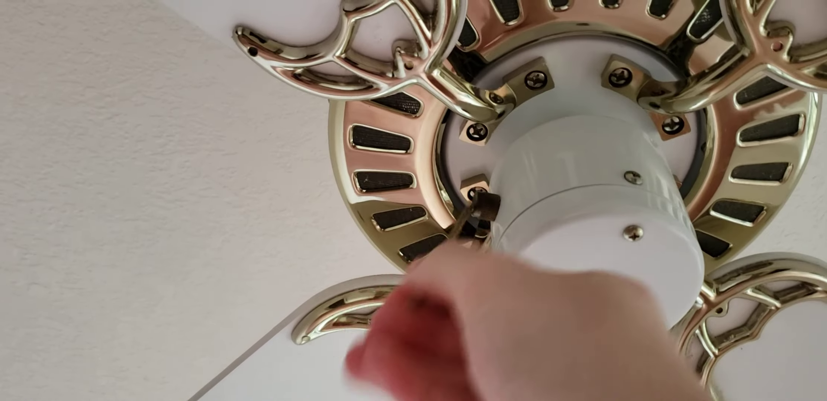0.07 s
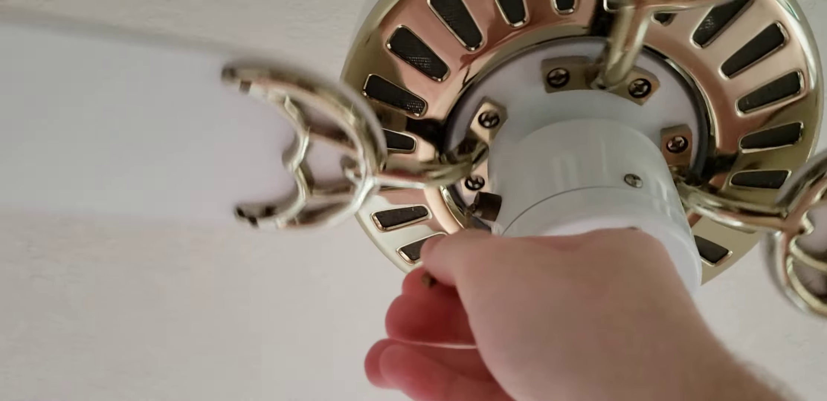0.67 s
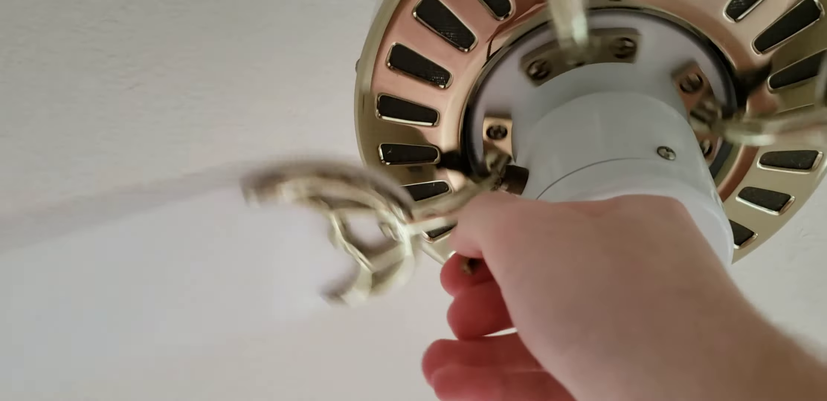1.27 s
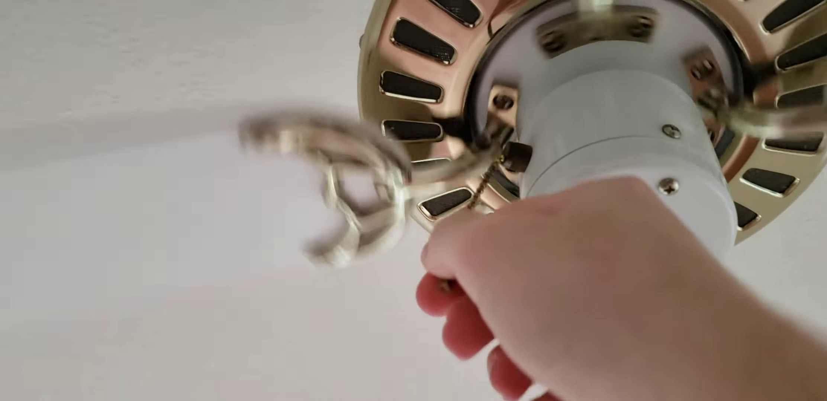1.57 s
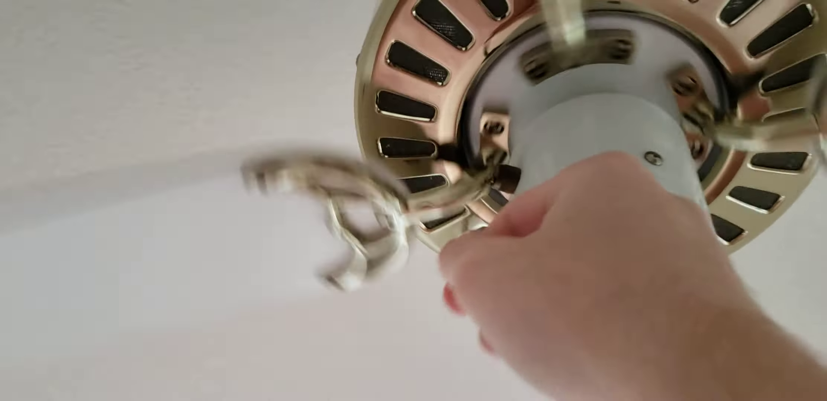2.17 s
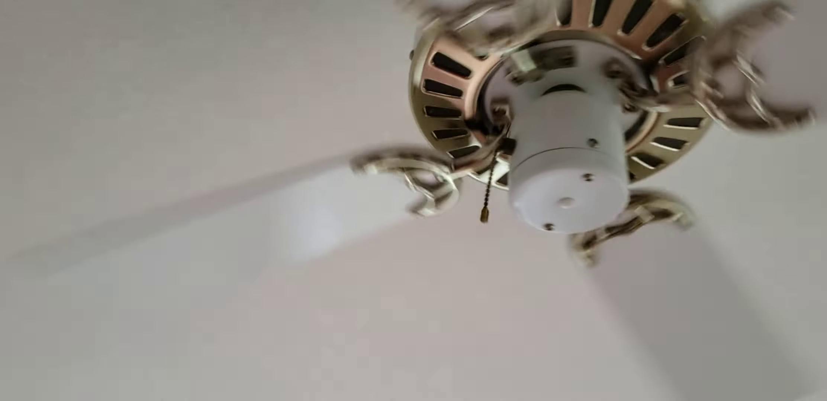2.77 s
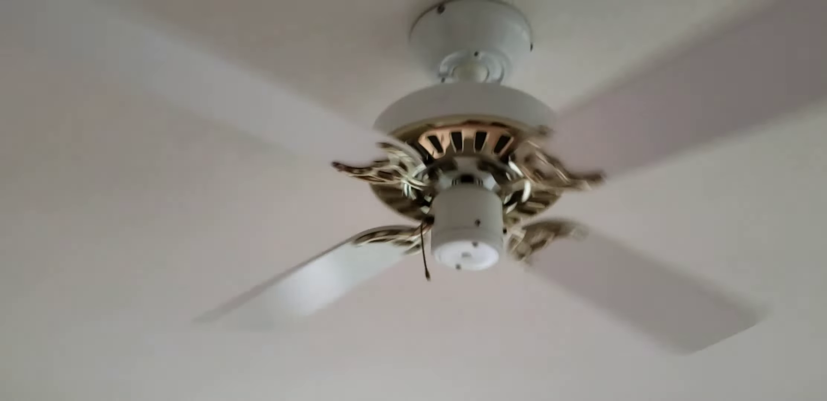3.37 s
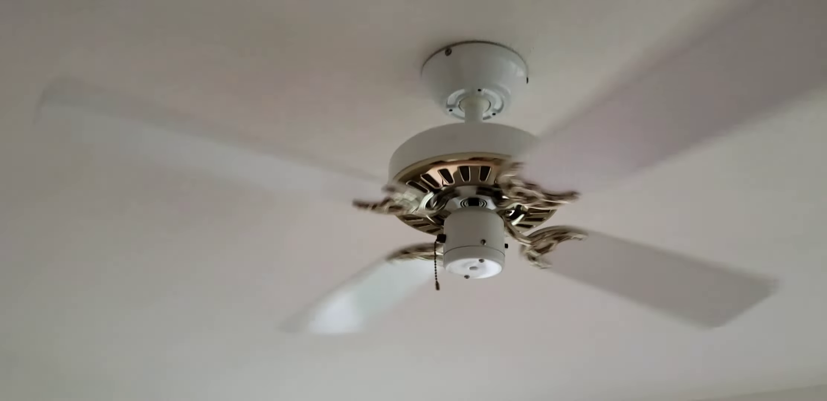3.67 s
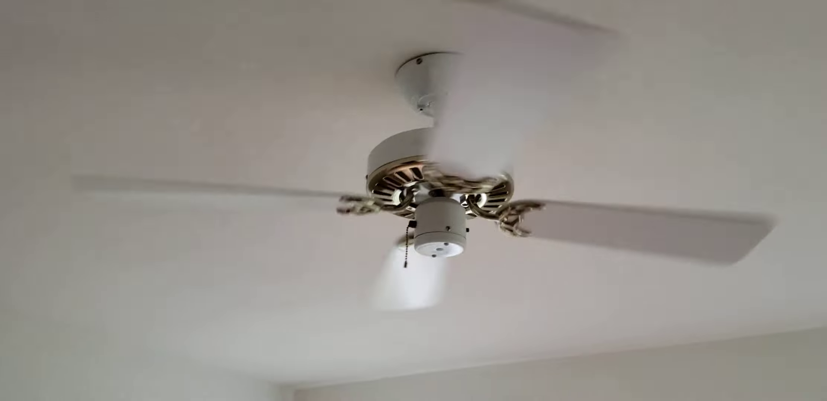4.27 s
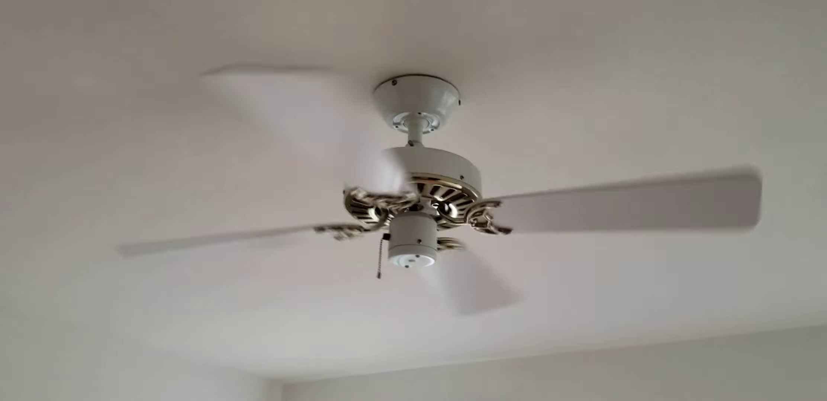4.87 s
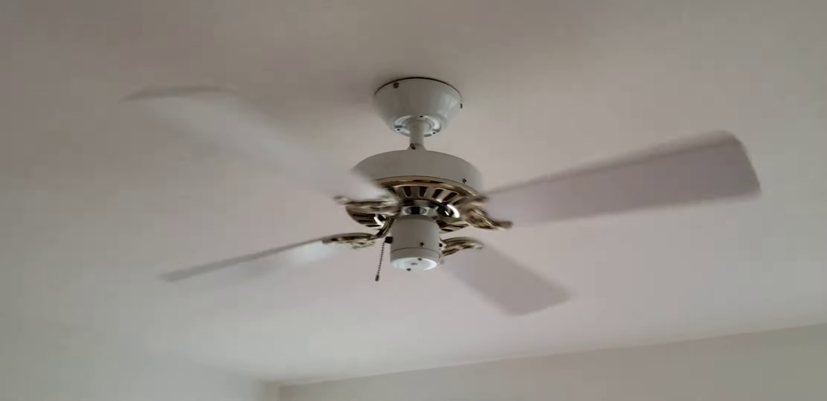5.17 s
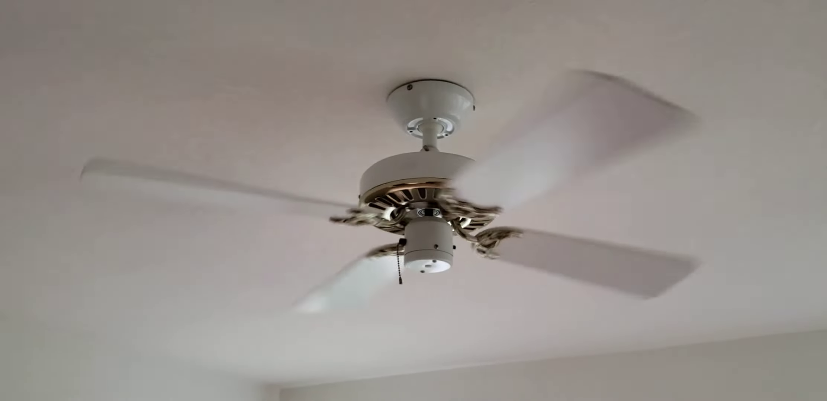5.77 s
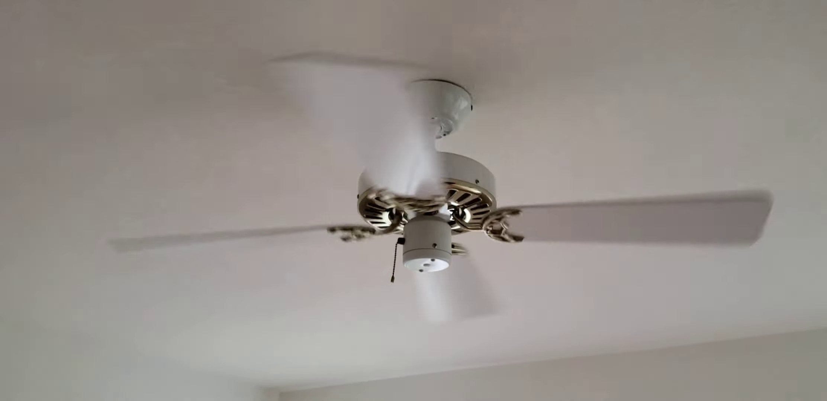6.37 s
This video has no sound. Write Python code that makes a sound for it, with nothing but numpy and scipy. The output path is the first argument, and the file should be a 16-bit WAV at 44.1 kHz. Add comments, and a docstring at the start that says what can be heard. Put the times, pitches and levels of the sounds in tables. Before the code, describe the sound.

A beaded chain ticks and a ceiling fan switch snaps sharply, again and again for a couple of seconds, close by in a small room. Each pull rings the metal housing briefly, and several bring a dull low thump. Afterwards it is much quieter: cloth rustles and small handling ticks sound near the microphone while the spinning fan stirs a soft, low rumble of air.

```python
"""Ceiling fan pull chain

A pull chain is tugged and let go again and again, close to a hand-held camera in a small room. Beads tick over
the eyelet and the switch snaps, each impact exciting the modes of its metal housing, while the tugs set the low
modes of the room booming. Then a sleeve swishes by friction as the camera backs away, over the soft rumble and
rush of the air stirred by the blades."""
import sys
import numpy as np
from scipy import signal
from scipy.fft import rfft, irfft, next_fast_len
from scipy.io import wavfile
from scipy.ndimage import uniform_filter1d, map_coordinates

SR = 44100
rng = np.random.default_rng(int(sys.argv[2]) if len(sys.argv) > 2 else 0)


def wav_record(signal):
    """Record a signal, one row per channel, as 16-bit PCM in the file named by sys.argv[1]."""
    frames = np.transpose(np.atleast_2d(signal))
    bounded = np.clip(frames, -1, 1)
    # unit amplitude maps onto the largest positive 16-bit level
    quanta = np.round(bounded * 32767).astype(np.int16)
    wavfile.write(sys.argv[1], SR, quanta)


N = 287532


def amp(db):
    """Amplitude ratio of a level in decibels."""
    return 10 ** (np.asarray(db) / 20)


def unit(x):
    """Normalisation to rms 1."""
    return x / np.sqrt(np.mean(x ** 2) + 1e-20)


def along(points, hz):
    """Interpolation of (f/Hz, value) points on a logarithmic frequency axis."""
    f, values = np.transpose(points)
    return np.interp(np.log(hz + 1), np.log(f), values)


def wobble(rate):
    """Smooth random modulation: a spline through `rate` Gaussian values a second."""
    knots = rng.standard_normal(int(N * rate / SR) + 4)
    return map_coordinates(knots, [np.arange(N) * rate / SR])


def add(track, onset, sound):
    """Superposition of a sound on the track, from an onset in seconds."""
    part = track[..., max(round(onset * SR), 0):][..., :sound.shape[-1]]
    part += sound[..., :part.shape[-1]]


def filtered(x, response):
    """Linear filtering: the spectrum is multiplied by a frequency response."""
    n = x.shape[-1]
    padded = next_fast_len(n + 2048)
    return irfft(rfft(x, padded) * response(np.fft.rfftfreq(padded, 1 / SR)), padded)[..., :n]


# Likeness of the sound at the two microphone ports: f/Hz, coherence
COHERENCE = [(60, 0.94), (290, 0.84), (640, 0.48), (1400, 0), (15000, 0.17)]
def noise(spectrum, size=N):
    """Partially coherent stereo noise of rms 1: long waves reach both ports alike."""
    padded = next_fast_len(size)
    hz = np.fft.rfftfreq(padded, 1 / SR)
    angle = np.arccos(np.clip(along(COHERENCE, hz), -1, 1)) / 2
    white = rng.standard_normal((2, len(hz))) + 1j * rng.standard_normal((2, len(hz)))
    coloured = white * amp(along(spectrum, hz))
    mid, side = irfft(coloured * [np.cos(angle), np.sin(angle)], padded)[:, :size]
    return unit(np.array([mid + side, mid - side]))


def burst(spectrum, rise, t60, size=4096):
    """Impact transient: noise that rises to rms 1 and decays exponentially (rise/s, t60/s)."""
    t = np.arange(size) / SR
    envelope = (1 - np.exp(-t / rise)) ** 2 * amp(-60 * t / t60)
    envelope /= envelope.max()
    return unit(noise(spectrum, size) * envelope) * np.sqrt(np.mean(envelope ** 2))


# Spectra of the blades' rumble, their rush of air and the room's hiss: f/Hz, relative level/dB
RUMBLE_SPECTRUM = [(12, -63), (20, -36.5), (27, -24), (29, -24), (36, -22.5), (46, -6), (59, 6.5),
                   (83, 3.5), (100, -3), (119, -5.5), (173, -12), (200, -28), (260, -50.5), (440, -120)]
RUSH_SPECTRUM = [(90, -12.5), (170, -0.5), (280, -1), (400, -3), (520, -10), (750, -22), (1400, -38)]
ROOM_HISS_SPECTRUM = [(350, -37.5), (600, -2), (748, -5), (812, -3.5), (1160, -9), (1590, 0), (2340, -5.5),
                      (2910, -12), (4050, -9.5), (5870, -15.5), (7310, -3.5), (9110, -12.5), (12700, -14),
                      (16000, -14.5)]
# Strength of the rush in the fan's draught: t/s, relative level/dB
RUSH_LEVELS = [(2.5, -69.5), (3.02, -74), (3.28, -67.5), (3.68, -63.5), (4.56, -70), (4.77, -69.5),
               (6.5, -68.5)]
def fan(rumble_db, downwash_db, rush_db, hiss_db):
    """Turbulence: the blades stir a rumble, stronger in their downwash, and a rush over faint room hiss."""
    t = np.arange(N) / SR
    entry_s, rise_s = 3.14, 0.25  # the camera backs into the draught
    in_downwash = (1 + np.tanh((t - entry_s) / (2 * rise_s))) / 2
    rumble = amp(rumble_db + downwash_db * in_downwash + 1.1 * wobble(4)) * noise(RUMBLE_SPECTRUM)
    draught_db = np.interp(t, *np.transpose(RUSH_LEVELS))
    rush = amp(draught_db + rush_db + 1.5 * wobble(7)) * noise(RUSH_SPECTRUM)
    return rumble + rush + amp(hiss_db) * noise(ROOM_HISS_SPECTRUM)


# Rubs of taut chain and cloth: crest t/s, half-length/s, f/Hz, bandwidth/Hz, relative level/dB
RASPS = [(0.609, 0.094, 1500, 201, -74), (1.32, 0.24, 1510, 59.9, -86), (1.396, 0.051, 1784, 503, -65.5),
         (1.40, 0.046, 3900, 500, -71.5), (3.31, 0.036, 4725, 1300, -54.5), (3.44, 0.2, 2270, 520, -62),
         (3.469, 0.09, 3350, 1200, -59), (3.656, 0.23, 2250, 420, -64), (3.645, 0.061, 4900, 1100, -65.5),
         (3.996, .14, 3540, 1100, -66), (4.909, 0.068, 3130, 920, -53.5), (5.608, 0.039, 900, 400, -62.5),
         (5.864, 0.037, 3980, 1400, -55.5), (6.24, 0.065, 5200, 1400, -63)]
def scrapes(level_db):
    """Sliding friction: a surface catches briefly and rasps in one narrow band."""
    out = np.zeros((2, N))
    for crest, half_length, hz, width, db in RASPS:
        size = int(2 * half_length * SR)
        rasp = filtered(rng.standard_normal((2, size)), lambda f: 1 / (1 + ((f - hz) / (width / 2)) ** 2))
        add(out, crest - half_length, amp(db + level_db) * unit(rasp) * np.hanning(size))
    return out


# Fingers on the camera: t/s, relative tick level/dB, relative bump level/dB
FINGER_TAPS = [(3.8455, -46, -55.5), (3.883, -50, -76), (3.9178, -44, -71), (4.478, -56.5, -74),
               (4.7403, -54, -43), (5.2579, -47.5, -76), (5.2835, -39, -49)]
def finger_taps(tick_db, bump_db):
    """Heavily damped impacts: fingers shifting on the case make dry ticks and dull bumps."""
    tick_spectrum = [(500, -11), (1500, 9.5), (4000, 9.5), (13000, 4.5), (17000, -5)]
    bump_spectrum = [(60, 1), (400, 2), (750, -5), (1400, -36), (4000, -47)]
    out = np.zeros((2, N))
    for onset, high_db, low_db in FINGER_TAPS:
        tick = burst(tick_spectrum, rise=0.00005, t60=0.0049)
        bump = burst(bump_spectrum, rise=0.00043, t60=0.022)
        add(out, onset, amp(high_db + tick_db) * tick + amp(low_db + bump_db) * bump)
    return out


def shifting_folds(x, depth_db):
    """Time-varying filtering: folds of cloth colour the sound in random patches of time and frequency."""
    spectra = signal.stft(x, nperseg=512)[2]
    patches = uniform_filter1d(rng.standard_normal(spectra.shape[1:]), size=7, axis=0)
    patches = uniform_filter1d(patches, size=16, axis=1)
    return unit(signal.istft(spectra * amp(depth_db * unit(patches)), nperseg=512)[1][:, :N])


# Arm strokes: crest t/s, rise/s, fall/s, relative level/dB, rub offset/dB, hiss offset/dB
SLEEVE_STROKES = [(2.6, 0.037, 0.081, -73.5, -13, -3.5), (2.81, .05, 0.048, -71, -19, -3.5),
                  (2.89, .03, 0.044, -73, -19, -4), (3.168, 0.032, 0.07, -62.5, -10, -4.5),
                  (3.3, 0.017, 0.06, -53.5, -21, -11.5), (3.36, 0.048, 0.023, -59, -9, 0.5),
                  (3.455, 0.061, 0.078, -55.5, -24, -1), (3.64, 0.096, .06, -64, -13, -16),
                  (3.744, 0.05, 0.054, -53.5, -11.5, -6), (3.85, .04, .06, -65, -2, -8),
                  (3.925, 0.021, 0.23, -65, -12, -4), (4.27, 0.057, 0.052, -60, -22, 2),
                  (4.303, .025, 0.058, -57, -10, -14), (4.42, .04, 0.051, -69.5, -11, -2),
                  (4.616, 0.065, 0.083, -56, -5, -1.5), (4.759, .015, 0.058, -52, -7, -10.5),
                  (4.815, 0.047, 0.089, -52.5, -6.5, -5.5), (4.916, .055, 0.055, -53.5, -7.5, -2.5),
                  (5.06, 0.084, 0.095, -53.5, -15.5, -2), (5.17, 0.059, 0.063, -62.5, -5.5, -1),
                  (5.295, .01, 0.083, -72, 3.5, -1.5), (5.612, 0.028, 0.031, -55, -2, 2.5),
                  (5.853, .015, 0.054, -56, -2, -25), (5.975, 0.026, 0.028, -65, -3, -3),
                  (6.044, 0.06, 0.079, -61.5, -5.5, -3), (6.295, 0.084, 0.058, -54.5, -12, -5.5)]
def stroke_envelopes():
    """Incoherent addition: overlapping strokes sum in power, giving the gains of swish, rub and hiss."""
    edge_db, roundness = 11.5, 1.28  # drop one rise or fall time from the crest; exponent of the slope
    t, power = np.arange(N) / SR, np.zeros((3, N))
    for crest, rise, fall, db, rub_db, hiss_db in SLEEVE_STROKES:
        near = slice(max(int((crest - 5 * rise) * SR), 0), int((crest + 5 * fall) * SR))
        from_crest = np.maximum((crest - t[near]) / rise, (t[near] - crest) / fall)
        envelope = amp(db - edge_db * from_crest ** roundness)
        power[:, near] += (amp([[0], [rub_db], [hiss_db]]) * envelope) ** 2
    return np.sqrt(power)


# Spectra of the cloth's swish, dull rub and fine hiss: f/Hz, relative level/dB
SWISH_SPECTRUM = [(1100, -17), (1800, -4), (2300, -2.5), (3600, -1), (5000, -4), (7000, -4), (9000, -14.5),
                  (12000, -54)]
RUB_SPECTRUM = [(200, -7.5), (450, 1.5), (650, 1), (1000, 4), (1300, -0.5), (1700, -2), (2600, -13.5)]
HISS_SPECTRUM = [(5500, -12), (8000, -6), (10000, -4.5), (12500, -4), (14000, -8.5), (15700, -15.5),
                 (16200, -40)]
# The arm lies off to one side: f/Hz, left minus right level/dB
SLEEVE_BALANCE = [(500, 8), (2000, 0.5), (7000, 0.5), (9500, -5), (12400, -7), (15000, -14.5)]
def sleeve(swish_db, rub_db, hiss_db, grain_db, snag_db):
    """Friction noise: cloth slides over cloth, and catching threads modulate its amplitude."""
    swish_gain, rub_gain, hiss_gain = stroke_envelopes()
    swish = amp(swish_db) * swish_gain * shifting_folds(noise(SWISH_SPECTRUM), depth_db=1.5)
    rub = amp(rub_db) * rub_gain * noise(RUB_SPECTRUM)
    hiss = amp(hiss_db) * hiss_gain * noise(HISS_SPECTRUM)
    grain = unit(amp(grain_db * wobble(370) + snag_db * wobble(45)))
    cloth = grain * (swish + rub + hiss)
    return filtered(cloth, lambda hz: amp(along(SLEEVE_BALANCE, hz) * np.array([[0.5], [-0.5]])))


# Reverberation time of the room: f/Hz, T60/s
REVERB_TIMES = [(100, 0.37), (350, 0.45), (1000, 0.35), (2000, 0.46), (4000, 0.35), (7000, 0.47),
                (12400, 0.33), (16000, 0.27)]
# Early reflections from ceiling and walls: delay/s, relative level/dB
REFLECTIONS = [(0.0128, -14), (0.018, -23.5), (.0285, -19)]
def room(x, wet_db, echo_db, build_s, block=13000):
    """Reverberation: direct sound, early reflections and a diffuse tail that decays exponentially."""
    tail_spectrum = [(100, -1), (1000, 1), (2000, 4), (3000, 1.5), (3800, 3.5), (5000, 2.5),
                     (7000, -0.5), (9000, -7.5), (12400, -5), (16000, -4)]
    out = x.copy()
    last_snap = int(SWITCH_SNAPS[-1][0] * SR)
    # Each block meets its own random draw of the diffuse tail.
    for start in range(0, last_snap + block // 2, block):
        hz, t, spectra = signal.stft(noise(tail_spectrum, size=SR // 2), SR, nperseg=256)
        envelope = amp(-60 * t / along(REVERB_TIMES, hz)[:, None]) * (1 - np.exp(-t / build_s))
        tail = signal.istft(spectra * envelope, SR, nperseg=256)[1]
        response = amp(wet_db) * tail / np.linalg.norm(tail, axis=1, keepdims=True)
        for delay, db in REFLECTIONS:
            for channel in response:
                add(channel, delay + 0.00036 * rng.standard_normal(), amp([db + echo_db]))
        add(out, start / SR, signal.fftconvolve(x[:, start:start + block], response, axes=1))
    return out


# Booms of the room's low modes at tugs and releases: t/s, f/Hz, relative level/dB, T60/s
ROOM_MODE_BOOMS = [(0.136, 53.7, -34, 1.12), (0.209, 87.2, -39.5, 2.1), (0.692, 57.2, -52.5, 0.83),
                   (1.442, 54.5, -37.5, 0.97), (1.522, 73.8, -32, 1.3), (1.975, 53.9, -38, 1.07),
                   (2.236, 72.4, -54, 1.2)]
def room_mode_thumps(swell_s, level_db):
    """Modal resonance: each jerk of the fan excites low modes of the room, which swell and decay."""
    out, t = np.zeros(N), np.arange(SR) / SR
    for onset, hz, db, t60 in ROOM_MODE_BOOMS:
        envelope = amp(db + level_db - 60 * t / t60) * (1 - np.exp(-t / swell_s))
        add(out, onset, envelope * np.sin(2 * np.pi * hz * t))
    return out


# The switch snaps and the chain jerks; levels are relative:
# t/s, click level/dB, tilt/(dB per octave), chink level/dB, knock level/dB, hollow level/dB
SWITCH_SNAPS = [(0.1332, -19.5, -0.5, -48, -41, -57), (0.1369, -18.5, 2, -34, -43, -37),
                (0.1458, -21, -3, -38, -45, -49), (0.1479, -19.5, -0.5, -40, -33.5, -41.5),
                (0.2019, -30.5, 6, -50.5, -36.5, -34), (0.2082, -21.5, 6, -39.5, -31, -42.5),
                (0.6928, -15.5, 3, -28.5, -30.5, -39.5), (1.4606, -32.5, -8, -29, -35, -47),
                (1.465, -24, -0.5, -29, -32.5, -33), (1.5228, -33.5, -13, -34, -37.5, -32),
                (1.7183, -16.5, 1.5, -31, -30.5, -39), (1.9935, -29, 7, -30.5, -39.5, -36),
                (1.9975, -21, 6.5, -47, -36, -36), (2.2356, -14.5, -1, -32, -32, -42)]
# Beads cross the eyelet as the chain tightens: t/s, relative click level/dB, relative chink level/dB
BEAD_TICKS = [(0.1135, -46, -71.5), (0.6314, -58.5, -71), (0.6537, -38, -46.5), (0.6724, -38, -39.5),
              (1.3996, -58, -74), (1.4292, -40, -41), (1.4413, -33, -47), (1.4493, -28, -41),
              (1.684, -35.5, -52.5), (1.6989, -35, -42.5), (1.9024, -44.5, -44.5), (1.959, -38, -41.5),
              (1.9776, -33.5, -32), (2.2036, -36.5, -54.5), (2.2191, -33.5, -39.5)]
def contacts():
    """All impacts in the snaps' columns; by linearity a bead's knocks scale with its click."""
    tilt, knock_offset_db, hollow_offset_db = 2.5, -12.5, -19.5
    beads = [(onset, click_db, tilt, chink_db, click_db + knock_offset_db, click_db + hollow_offset_db)
             for onset, click_db, chink_db in BEAD_TICKS]
    return SWITCH_SNAPS + beads


def motor_shudder(level_db, t60):
    """Damped vibration: each knock sets the motor and blades shuddering briefly."""
    spectrum = [(22, -20), (40, -13), (60, 5), (135, -0.5), (210, -13.5), (350, -6), (600, -36.5)]
    power, t = np.zeros(N), np.arange(SR // 2) / SR
    for onset, *_, hollow_db in contacts():
        envelope = amp(hollow_db + level_db - 60 * t / t60) * (1 - np.exp(-t / 0.0048))
        add(power, onset, envelope ** 2)
    return np.sqrt(power) * noise(spectrum)


def ring(modes, spread_db, port_phase, detune, size=4096):
    """Modal superposition: damped sinusoids whose strength, pitch and phase vary from blow to blow."""
    t = np.arange(size) / SR
    hz, bandwidth, db = np.transpose(modes)[:, :, None]
    hz = hz * (1 + detune * rng.standard_normal(hz.shape))
    gain = amp(db + spread_db * rng.standard_normal(hz.shape))
    phase = rng.uniform(0, 2 * np.pi, hz.shape) + port_phase * rng.standard_normal((2, len(hz), 1))
    partials = gain * np.exp(-np.pi * bandwidth * t) * np.sin(2 * np.pi * hz * t + phase)
    attack = 1 - np.exp(-t / 0.00089)
    return partials.sum(axis=0 + 1) / np.linalg.norm(gain) * attack


# Spectra of a steel click and of the crack of the housing: f/Hz, relative level/dB
STEEL_SPECTRUM = [(1000, -34), (2800, -25.5), (3800, -12), (4900, -17.5), (5800, -9.5), (7000, -7),
                  (8300, -2.5), (9700, -1), (10900, -4.5), (12400, 2.5), (13800, -7), (15600, -5),
                  (17000, -32.5)]
CRACK_SPECTRUM = [(120, -27.5), (330, -12), (550, -10.5), (780, -5), (1000, 1.5), (1250, -4), (1600, -4.5),
                  (2200, 0.5), (2800, -10.5), (3400, -1), (4800, -14.5), (7000, -17.5), (12000, -32)]
# Modes of chain and eyelet, of the housing's walls and of its cup: f/Hz, bandwidth/Hz, relative level/dB
EYELET_MODES = [(3600, 200, -1), (3560, 190, -1.5), (3810, 40, -3), (3860, 250, -6.5), (4104, 97, -1)]
WALL_MODES = [(890, 33, -7.5), (957.7, 40, 3.5), (1038, 200, -14.5), (1370, 60, -9), (1487, 55, 0),
              (1685, 77, -3.5), (1846, 68, -6.5), (2210, 100, -19)]
CUP_MODES = [(369.8, 22, -4.5), (506, 48, -1.5), (572, 49, 1), (644.6, 55, -1)]
def pull_chain(steel_db, jingle_db, crack_db, wall_db, eyelet_db, cup_db):
    """Impact excitation: each steel contact clicks, jingles and rings the eyelet, housing and cup."""
    out = np.zeros((2, N))
    for onset, click_db, tilt, chink_db, knock_db, hollow_db in contacts():
        # A harder contact has more treble.
        spectrum = [(hz, db + tilt * np.log2(hz / 10000)) for hz, db in STEEL_SPECTRUM]
        click = amp(click_db + steel_db) * burst(spectrum, rise=0.0023, t60=0.0078)
        jingle = amp(click_db + jingle_db) * burst(spectrum, rise=0.00089, t60=0.047)
        chink = amp(chink_db + eyelet_db) * ring(EYELET_MODES, spread_db=3, port_phase=0.65, detune=0.026)
        crack = amp(knock_db + crack_db) * burst(CRACK_SPECTRUM, rise=0.00047, t60=0.049)
        walls = amp(knock_db + wall_db) * ring(WALL_MODES, spread_db=4, port_phase=0.23, detune=0.0073)
        cup = amp(hollow_db + cup_db) * ring(CUP_MODES, spread_db=5.5, port_phase=0.082, detune=0.01)
        add(out, onset, click + jingle + chink + crack + walls + cup)
    return out


def scene():
    """Superposition of the chain in its room, the booming room modes and the shaking motor, the arm and the
    moving air."""
    chain = pull_chain(steel_db=-0.5, jingle_db=-18, crack_db=0, wall_db=5, eyelet_db=2.5, cup_db=5)
    chain = room(chain, wet_db=-8, echo_db=1, build_s=0.0026)
    boom = room_mode_thumps(swell_s=0.02, level_db=-3) + motor_shudder(level_db=-10.5, t60=0.49)
    cloth = sleeve(swish_db=1.5, rub_db=0, hiss_db=-0.5, grain_db=1, snag_db=0.56)
    fingers = finger_taps(tick_db=2.5, bump_db=0.5)
    rasps = scrapes(level_db=3)
    air = fan(rumble_db=-63, downwash_db=5.5, rush_db=2, hiss_db=-75)
    return air + rasps + fingers + cloth + boom + chain


# Difference in colour between the microphone ports: f/Hz, left minus right level/dB
PORT_BALANCE = [(60, 1.5), (250, 2), (700, 2), (1200, 6), (2200, 6), (4400, 4.5), (7000, 6.5), (9500, -2.5),
                (11000, -6.5), (12400, -9), (14500, 3)]
def record(dry):
    """Frequency response of the microphone: each port has its own colour below a steep band limit."""
    def response(hz, cutoff_hz=16300):
        balance = amp(along(PORT_BALANCE, hz) * np.array([[0.5], [-0.5]]))
        return balance / np.sqrt(1 + (hz / cutoff_hz) ** 120)
    return filtered(dry, response)


dry = scene()
out = record(dry)
wav_record(out)
```